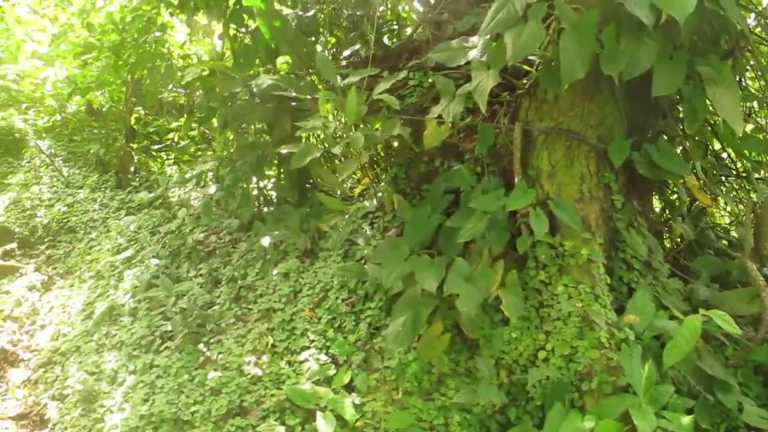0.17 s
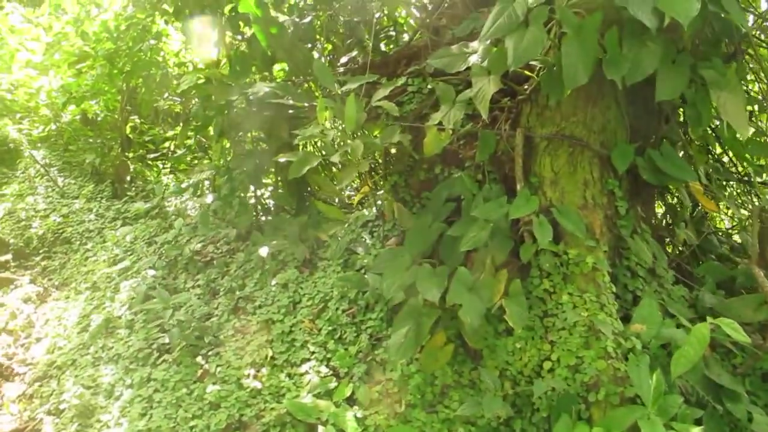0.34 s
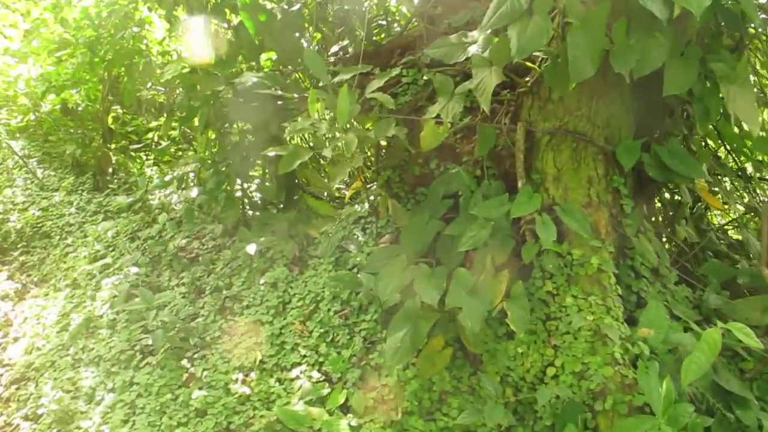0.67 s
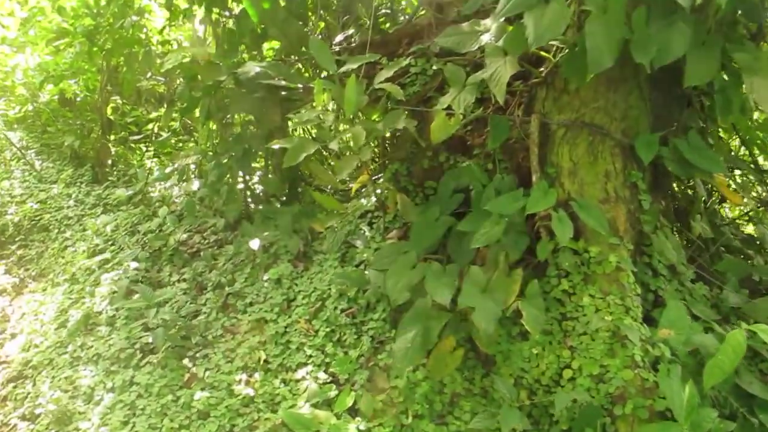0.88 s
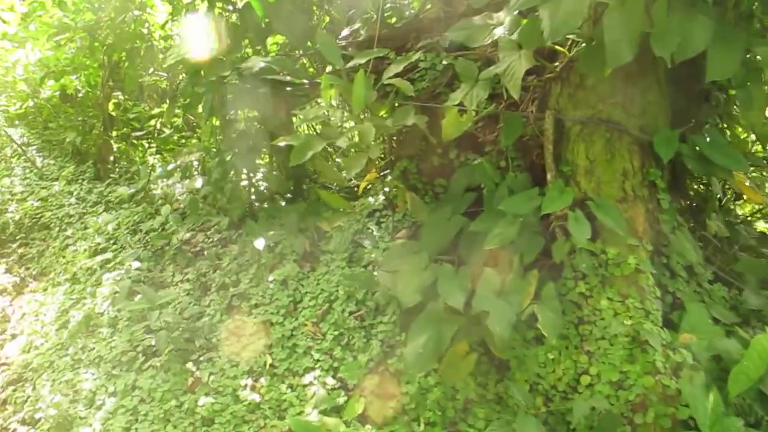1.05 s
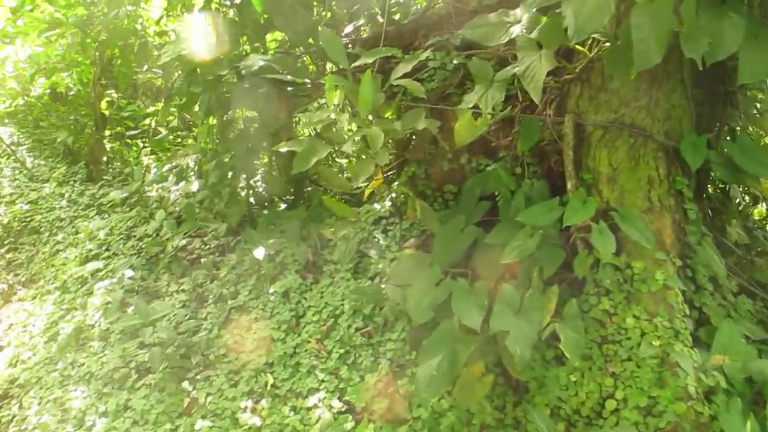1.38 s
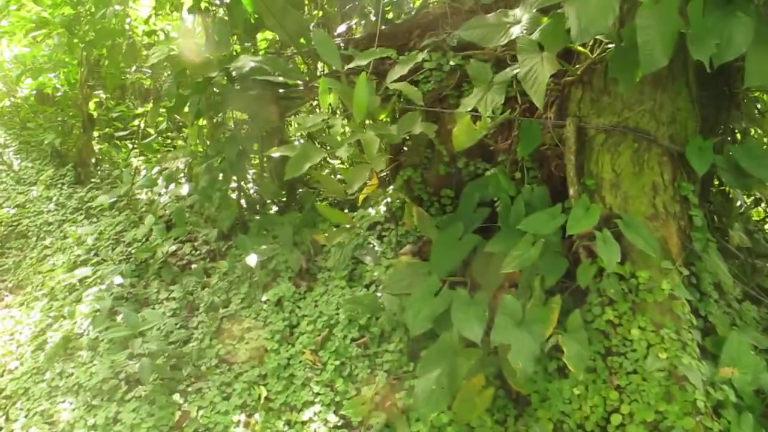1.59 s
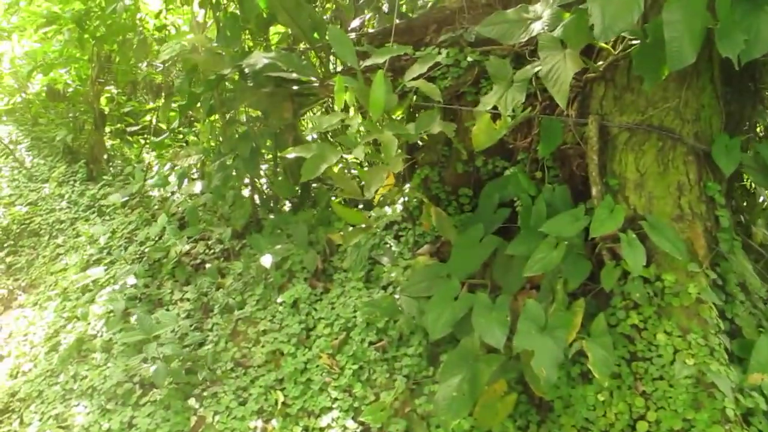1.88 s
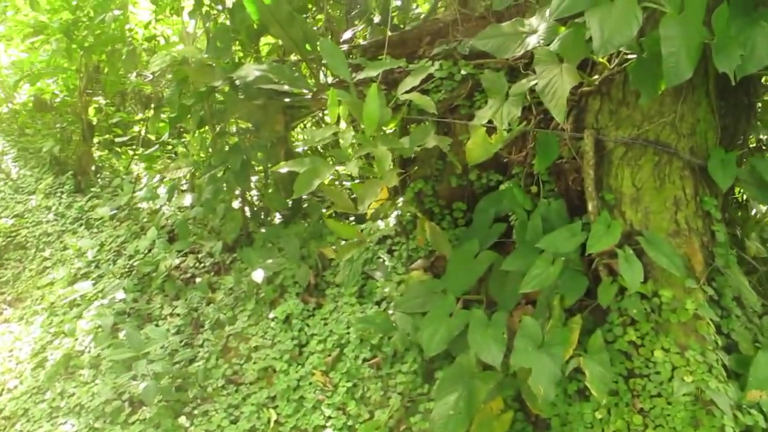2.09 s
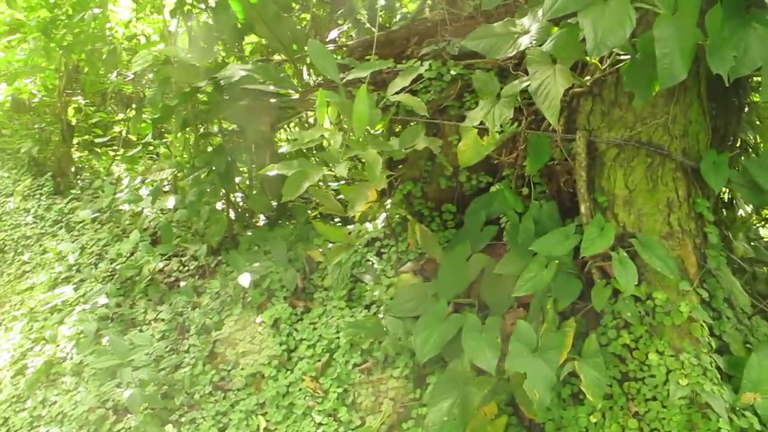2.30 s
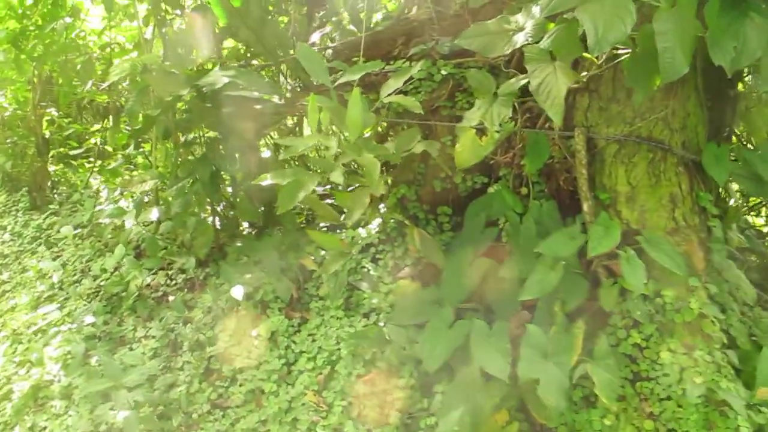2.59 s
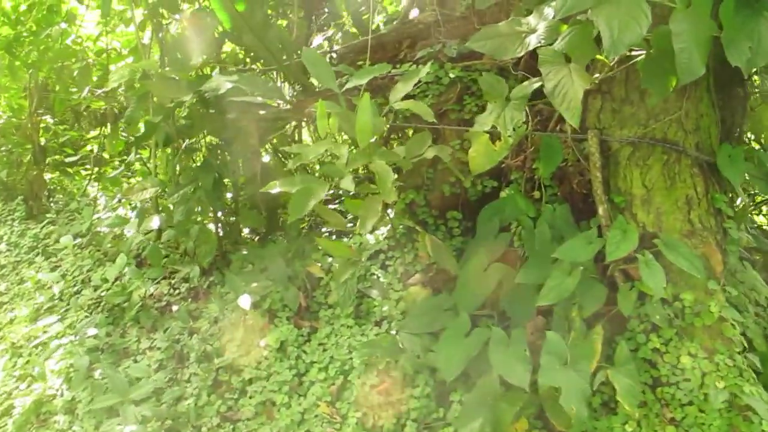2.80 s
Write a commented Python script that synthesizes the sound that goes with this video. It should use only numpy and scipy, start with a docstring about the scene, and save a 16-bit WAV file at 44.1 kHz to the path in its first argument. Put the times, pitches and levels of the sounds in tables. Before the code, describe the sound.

A small frog a few steps away gives bright, rasping chirps about nine a second without pause, with short tree echoes, faint rumble and insect hiss, and occasional handling knocks and leaf ticks on a handheld camera.

```python
"""A rainforest, where a small frog a few steps away calls about nine buzzy chirps a second: each chirp is
about a dozen clicks ringing its vocal sac, and the trees throw them back as sparse decaying echoes.
A far bird whistles and a far engine hums as wavering tones; rumble, leaf wash and insect hiss are shaped noise.
Leaves and the hand-held camera tick, knock and rustle now and then, as short rings, low cycles and tiny cracks."""
import sys
import numpy as np
from scipy import signal
from scipy.fft import rfft, irfft
from scipy.io import wavfile
from scipy.ndimage import uniform_filter1d

SR = 44100
rng = np.random.default_rng(int(sys.argv[2]) if len(sys.argv) > 2 else 0)


def generate_wav(signal):
    """Clip the signal to [-1, 1] and save it as 16-bit WAV at the path in sys.argv[1]."""
    frames = np.transpose(np.atleast_2d(signal))
    scaled = np.clip(frames, -1, 1) * 32767
    pcm = np.round(scaled).astype(np.int16)
    wavfile.write(sys.argv[1], SR, pcm)


def rack_gain(trim_db):
    """Turn a fader trim in dB into the linear factor to multiply a signal by."""
    fader = np.asarray(trim_db, float)
    return 10 ** (fader / 20)


N = 129654  # length [samples]

# Relative treble colour of leaf and twig cracks: (frequency [Hz], gain [dB])
CRACK_COLOUR = [(600, -9), (2500, 0.5), (7500, -1.5), (12000, -36)]


def evened(x):
    """Scales a sound to unit rms."""
    return x / np.sqrt(np.mean(x ** 2) + 1e-20)


def read(points, hz):
    """Reads a table on a log-frequency axis."""
    f, value = np.transpose(points)
    return np.interp(np.log(hz + 1), np.log(f + 1), value)


def add(mix, s, sound):
    """Mixes a sound in at a time in seconds."""
    part = mix[..., round(s * SR):][..., :sound.shape[-1]]
    part += sound[..., :part.shape[-1]]


def pan(x, db):
    """Sets a level difference, left minus right [dB]."""
    return x * rack_gain(np.array([[db / 2], [-db / 2]]))


def shape(x, gain):
    """Filters by a gain given as a function of frequency."""
    return irfft(rfft(x) * gain(np.fft.rfftfreq(x.shape[-1], 1 / SR)), x.shape[-1])


def fuzzy(hz, width_hz):
    """A tone whose strength and phase waver with slow noise, spreading it over a width."""
    r = np.exp(-np.pi * width_hz / SR)
    noise = rng.standard_normal(N + SR) + 1j * rng.standard_normal(N + SR)
    slow = signal.lfilter([1], [1, -2 * r, r * r], noise)[SR:]
    tone = np.exp(2j * np.pi * np.cumsum(hz * np.ones(N)) / SR)
    return evened((tone * (1 + slow / np.std(slow))).real)


def air():
    """Low rumble, leaf wash and far insect hiss: noise shaped in frequency, with drifting patches."""
    # Relative spectrum of the air: (frequency [Hz], density [dB per Hz])
    spectrum = [(20, -6), (60, -3.5), (300, -11.5), (880, -21), (2800, -25.5), (5000, -12), (7000, -20.5),
                (8500, -28), (10800, -36.5), (15600, -46)]
    # Left-right likeness of the noise: (frequency [Hz], correlation [-1 to 1])
    likeness = [(200, 0.97), (2400, 0.56), (12000, 0.034)]
    # Stereo balance: (frequency [Hz], left minus right [dB])
    balance = [(5000, -1.5), (7500, -9), (11000, -2)]
    air_db, patchy_db = -43, 2  # rms level, rms depth of the patches
    frames, hz = N // 256 + 5, np.fft.rfftfreq(1024, 1 / SR)
    a, b, c, d, patches = rng.standard_normal((frames, 513, 5)).T
    patches = evened(uniform_filter1d(uniform_filter1d(patches, 12, 0), 14, 1))
    same = np.clip(read(likeness, hz), -1, 1)[:, None]
    side = rack_gain(read(balance, hz) / 2)[:, None]
    left = a + 1j * b
    right = same * left + np.sqrt(1 - same ** 2) * (c + 1j * d)
    z = np.array([left * side, right / side])
    z *= rack_gain(read(spectrum, hz)[:, None] + patchy_db * patches)
    return rack_gain(air_db) * evened(signal.istft(z, nperseg=1024, noverlap=768)[1][:, :N])


def hum():
    """A far engine note glides up and fades, over two drones of steady pitch."""
    # Engine note: (time [s], pitch [Hz], level [dB])
    engine = [(0, 111, -44.5), (1.099, 120.4, -49.5), (1.401, 130.5, -53.5), (2.94, 130, -56.5)]
    # Drones: (pitch [Hz], width [Hz], level at start [dB], level at end [dB])
    drones = [(71.5, 24, -57, -45), (212, 6.9, -52, -58.5)]
    t, (s, hz, db) = np.arange(N) / SR, np.transpose(engine)
    out = rack_gain(np.interp(t, s, db)) * fuzzy(np.interp(t, s, hz), width_hz=12)
    for pitch, width, start_db, end_db in drones:
        out = out + rack_gain(np.linspace(start_db, end_db, N)) * fuzzy(pitch, width)
    return pan(out, -1.85)


def bird():
    """Thin far whistles: wavering tones gliding in a straight line."""
    # Whistles: (start [s], length [s], from [Hz], to [Hz], level [dB])
    whistles = [(.065, .2, 2500, 2430, -59), (2.71, 0.23, 2070, 2410, -60.5)]
    out = np.zeros(N)
    for start, length, from_hz, to_hz, db in whistles:
        u = np.clip((np.arange(N) / SR - start) / length, 0, 1)
        swell = np.sin(np.pi * u) ** 0.06
        out += rack_gain(db) * swell * fuzzy(from_hz + (to_hz - from_hz) * u, width_hz=72)
    return pan(out, -1.3)


def trees(x):
    """Sparse random echoes, each band dying at its own speed; three tails take turns as leaves move."""
    # Decay among the trees: (frequency [Hz], time to fall 60 dB [s])
    decay = [(3400, 0.099), (5000, 0.15), (7500, 0.13)]
    same = 0.16  # left-right likeness of the echoes
    out, t, size = np.zeros((2, N)), np.arange(N) / SR, SR // 2
    for k in range(3):
        delayed = np.clip(np.arange(size) / 500 - .5, 0, 1)  # silent for 6 ms, full from 17 ms
        taps = rng.standard_normal((2, size)) * (rng.random((2, size)) < .05) * delayed
        taps[1] = same * taps[0] + np.sqrt(1 - same ** 2) * taps[1]
        hz, tt, z = signal.stft(taps, SR, nperseg=128)
        tail = signal.istft(z * rack_gain(-60 * tt / read(decay, hz)[:, None]), SR, nperseg=128)[1]
        tail = tail / np.linalg.norm(tail[0])
        share = np.sqrt(2 / 3) * np.cos(np.pi * (2.427 * t + k / 3))  # the three powers sum to one
        out += signal.fftconvolve(x * share, tail, axes=1)[:, :N]
    return out


def rustle():
    """Clumps of tiny random cracks, leaking between left and right."""
    # Clumps: (start [s], length [s], level [dB])
    clumps = [(0.679, 0.088, -47), (0.92, .22, -43.5), (2.037, 0.07, -49.5), (2.293, 0.12, -47.5)]
    cracks_per_s = 970  # drawn for each channel
    hits = rng.random((2, N)) < cracks_per_s / SR
    strength = rack_gain(5.7 * np.minimum(rng.exponential(1, (2, N)), 4))
    grains = hits * strength * rng.choice([-1, 1], (2, N))
    grains = grains + 2.8 * grains[::-1]
    grains = evened(shape(grains, lambda f: rack_gain(read(CRACK_COLOUR, f))))
    t, gate = np.arange(N) / SR, np.zeros(N)
    for s, length, db in clumps:
        gate += rack_gain(db) * np.sin(np.pi * np.clip((t - s) / length, 0, 1)) ** 0.14
    return pan(gate * grains, -5.5)


def knocks():
    """Each knock is a few low cycles, with a dull noise snap one cycle in."""
    # Knocks: (time [s], level [dB], pitch [Hz], snap relative to the level [dB])
    knock_list = [(0.69, -36, 491, -11), (2.05, -31, 182.8, -4.5), (2.105, -26.5, 354, -11.5),
                  (2.391, -33, 352, -8.5), (2.708, -31.5, 454, -11.5), (2.848, -40.5, 380, -12)]
    side_db, cycles = -1.5, 6.77
    snap_hz, snap_t60 = 1450, 0.062  # spectral peak, time to fall 60 dB [s]
    out, t = np.zeros((2, N)), np.arange(2000) / SR
    for s, db, hz, snap_db in knock_list:
        noise = rng.standard_normal(2000)
        snap = evened(shape(noise, lambda f: f / snap_hz * np.exp(-f / snap_hz)))
        snap = snap * rack_gain(-60 * t / snap_t60)
        add(out, s + 1 / hz, pan(rack_gain(db + snap_db) * snap, side_db))
        u = np.arange(4000) / SR * hz  # cycles since the knock
        thud = 2.86 * u * np.exp(-u * 7 / cycles) * np.sin(2 * np.pi * u)
        add(out, s, pan(rack_gain(db) * thud, side_db))
    return out


def ticks():
    """Leaf and twig ticks: a short decaying ring plus a noise crack."""
    # Ticks: (time [s], level [dB], ring [Hz], crack relative to the level [dB])
    tick_list = [(1.041, -45, 2560, 15), (1.073, -37, 974, 17), (1.099, -37.5, 925, 5),
                 (1.12, -31, 2335, 10), (2.306, -41.5, 1035, -6), (2.357, -43, 990, -19),
                 (2.561, -46, 2350, 11)]
    out, t = np.zeros((2, N)), np.arange(2000) / SR
    fall = rack_gain(-60 * t / 0.031) * np.minimum(t / 0.0012, 1)  # 31 ms to fall 60 dB, 1.2 ms rise
    for s, db, hz, crack_db in tick_list:
        noise = rng.standard_normal((2, 2000))
        crack = rack_gain(crack_db) * evened(shape(noise, lambda f: rack_gain(read(CRACK_COLOUR, f))))
        ring = 2 * np.sin(2 * np.pi * hz * t)
        add(out, s, rack_gain(db) * fall * pan(ring + crack, -4))
    return out


def click_gaps(length, gaps):
    """Spreads a curve of relative gaps, slightly jittered, over a part of a chirp [s]."""
    mean_gap_s, jitter = .00354, 0.025
    count = round(length / mean_gap_s)
    curve = np.interp(np.linspace(0, 1, count), np.linspace(0, 1, len(gaps)), gaps)
    curve = curve * (1 + jitter * rng.standard_normal(count))
    return length * curve / curve.sum()


def sac_click(late_s, level, progress, colour, spread):
    """One click rings the vocal sac: damped resonances, brighter when the click is louder."""
    # Sac resonances, the second the main one: (frequency [Hz], width [Hz], level [dB])
    sac = [(3771, 1120, -15), (4897, 467, 0.5), (5830, 1900, -10), (6500, 1340, -20.5), (9650, 1600, -23.5)]
    soft_hz, brighten, colour_rms_db = 3055, 3.3, 2.0
    hz, width, db = np.transpose(sac)
    main = hz[1]
    t = np.arange(400) / SR
    tt = np.maximum(t - late_s, 0)[:, None]
    colour_db = colour_rms_db * colour * (hz != main)
    # The upper rings start 0.5 dB weaker and come up to full level
    colour_db = colour_db + (hz > main) * np.interp(progress, [0, 1], (-0.5, 0))
    bright_db = brighten * level * np.maximum(hz / main - 1, -.1)
    # The sac rings a little lower as the series goes on
    pitch = hz * (np.interp(progress, [0, 1], (1.017, 0.98)) + spread)
    rings = rack_gain(db + colour_db + bright_db) * np.exp(-np.pi * width * tt) * np.sin(2 * np.pi * pitch * tt)
    onset = 1 - np.exp(-np.pi * soft_hz * t)
    return onset ** 2 * (rings @ (-1.) ** np.arange(len(hz)))  # neighbours in opposite phase


def frog():
    """Clicks swell at a quick pace, slow down at full strength, then hurry to the end of each chirp."""
    # Chirps: (first click [s], swelling part [s], loud part [s])
    chirps = [(.012, .0185, .023), (.1297, .0188, .0227), (.2464, .0181, .0233), (.3592, .0177, .0245),
              (.4795, .0143, .0248), (.5858, .0207, .0273), (.7054, .017, .0259), (.8198, .0208, .0239),
              (.936, .0182, .0274), (1.053, .0205, .0228), (1.169, .018, .0256), (1.2862, .0184, .0253),
              (1.4032, .018, .0269), (1.5203, .0199, .0267), (1.6392, .0178, .0251), (1.7545, .0184, .0239),
              (1.8718, .0205, .0228), (1.9885, .0183, .0239), (2.1055, .0178, .0239),
              (2.2201, .0205, .0243), (2.3406, .0182, .0253), (2.456, .0195, .0259), (2.5766, .0192, .0225),
              (2.6937, .0186, .0258), (2.8114, .0214, .0217), (2.9291, .018, .025)]
    # Relative gaps between clicks, evenly through the swelling part: (gap [ratio])
    swell_gaps = [1.2, .95, 1.0]
    # Relative gaps between clicks, evenly through the loud part: (gap [ratio])
    loud_gaps = [1.16, 1.14, .97, .72]
    # Weak extra clicks closing some chirps: (time [s])
    trailing = [.0553, .8667, 1.0983, 1.2148, 1.3321, 2.0326, 2.5035, 2.6206, 2.8566]
    # Effort of the calls: (time [s], level [dB])
    effort = [(0, -12), (1.45, -10), (2.94, -10)]
    start_db, turn_db, end_db = -16.5, -2, -3  # first click, end of the swell, fall at the end
    click_spread_db, trailing_db, sac_spread = .3, -5, .006
    out = np.zeros(N + SR // 10)
    for start, swell, loud in chirps:
        at = np.cumsum(np.r_[0, click_gaps(swell, swell_gaps), click_gaps(loud, loud_gaps)])
        rise = start_db + (turn_db - start_db) * np.sin(np.pi / 2 * np.minimum(at / swell, 1))
        u = np.maximum(at - swell, 0) / loud
        level = rise - turn_db * np.minimum(3 * u, 1) + end_db * u ** 5
        level = level + click_spread_db * rng.standard_normal(len(at))
        extra = [s - start for s in trailing if start < s < start + 2 * (swell + loud)]
        at, level = np.r_[at, extra], np.r_[level, np.full(len(extra), trailing_db)]
        colour = rng.standard_normal(5)  # one per sac resonance
        chirp_pitch = rng.standard_normal()
        effort_db = np.interp(start, *np.transpose(effort))
        for s, click_db in zip(at, level):
            spread = sac_spread * (rng.standard_normal() + chirp_pitch)
            late_s = (start + s) % (1 / SR)  # fraction of a sample
            click = sac_click(late_s, click_db, start * SR / N, colour, spread)
            add(out, start + s - .0005, 2 * rack_gain(effort_db + click_db) * click)
    band = signal.butter(N=5, Wn=[3300, 10190], btype="band", fs=SR, output="sos")
    return signal.sosfilt(band, out)


def heard(x):
    """Direct path into the two microphone ports, a near echo and the scatter of the trees."""
    # Port balance, before the camera's turn: (frequency [Hz], left minus right [dB])
    port_balance = [(3500, -5.5), (4800, -2), (6200, 1), (7500, -22), (10000, -10)]
    # Ringing echo off something close by, growing late in the series: (time [s], left [dB], right [dB])
    near_echo = [(2.1, -17.5, -20.5), (2.62, -2, -3.5)]
    left_lag_s, turning_db = .000025, (1, 2)  # turning: left minus right, start and end
    echo_s, echo_hz, echo_width_hz = .00062, 4810, 500
    trees_db = -12

    def port(k):
        return shape(x, lambda f: rack_gain(k * read(port_balance, f) / 2) * np.exp(-1j * k * np.pi * f * left_lag_s))

    direct = np.array([port(1), port(-1)])[:, :N]
    # The balance drifts as the camera turns
    direct = direct * rack_gain(np.array([[.5], [-.5]]) * np.linspace(*turning_db, N))
    out, (s, *db) = direct.copy(), np.transpose(near_echo)
    ring = signal.iirpeak(echo_hz, echo_hz / echo_width_hz, SR)
    echo = signal.lfilter(*ring, signal.lfilter(*ring, direct))
    echo_db = np.array([np.interp(np.arange(N) / SR, s, d) for d in db])
    add(out, echo_s, echo * rack_gain(echo_db))
    return out + rack_gain(trees_db) * trees(direct)


def scene():
    """All sources at the microphone; the leaf and camera noises also echo faintly off the trees."""
    near = rustle() + knocks() + ticks()
    near = near + rack_gain(-20) * trees(near)
    return air() + hum() + bird() + near + heard(frog())


def band_limit(x):
    """A steep low-pass at the top of the band."""
    return signal.sosfilt(signal.butter(12, 15700, fs=SR, output="sos"), x)


def record(dry):
    """A 3 ms fade closes the sound."""
    fade = np.minimum(np.arange(N)[::-1] / (.003 * SR), 1)
    return band_limit(dry * fade)


dry = scene()
out = record(dry)
generate_wav(out)
```